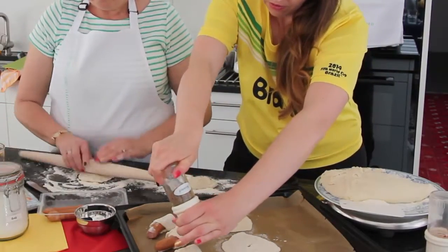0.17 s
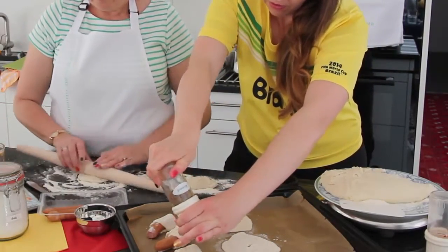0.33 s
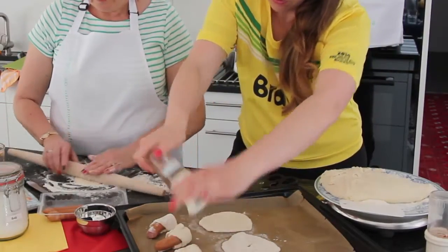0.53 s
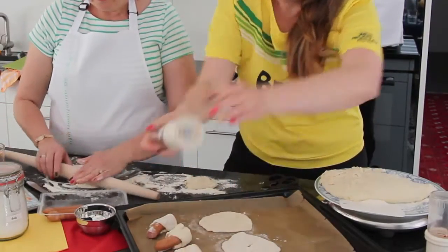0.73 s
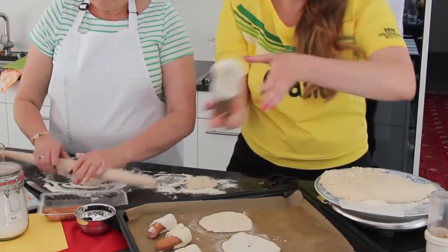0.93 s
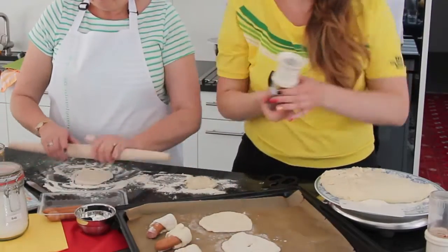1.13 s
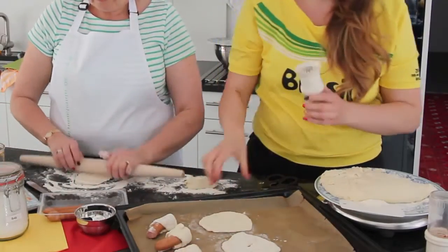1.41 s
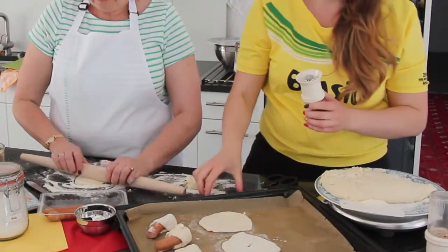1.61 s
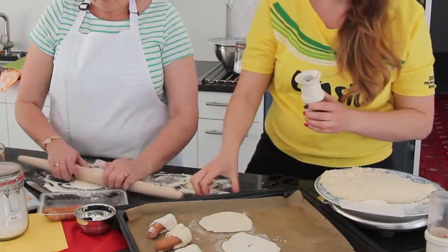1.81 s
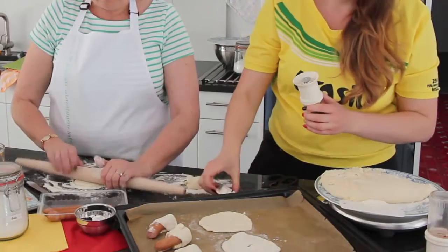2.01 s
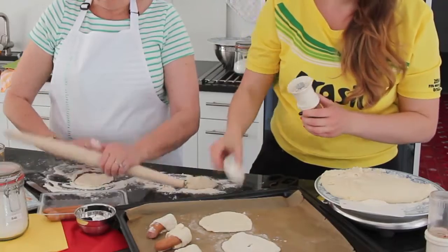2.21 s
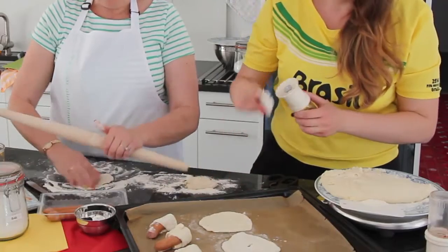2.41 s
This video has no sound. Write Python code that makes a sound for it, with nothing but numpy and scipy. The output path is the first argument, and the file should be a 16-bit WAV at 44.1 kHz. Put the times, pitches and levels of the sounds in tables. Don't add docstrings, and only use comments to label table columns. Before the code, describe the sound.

Rolling pin knocks and rebounds on a hard kitchen counter, followed by a softer thud and hollow cap clacks

```python
import sys
import numpy as np
from scipy import signal
from scipy.fft import rfft, irfft
from scipy.io import wavfile
from scipy.ndimage import uniform_filter1d

SR = 44100
rng = np.random.default_rng(int(sys.argv[2]) if len(sys.argv) > 2 else 0)


def to_linear_factor(level_db):
    exponent = np.asarray(level_db, float) / 20
    return 10 ** exponent


def generate_wav(signal):
    frames = np.transpose(np.atleast_2d(signal))
    scaled = np.clip(frames, -1, 1) * 32767
    pcm = np.round(scaled).astype(np.int16)
    wavfile.write(sys.argv[1], SR, pcm)


N = 112454


# start_s, ring_db, knock_db, tilt_db_per_octave
DROP_BLOWS = [
    (.2008, -26.5, -19.5, 4),
    (.2043, -22.5, -25, 0),
]
# mode_hz, level_db, t60_s
DROP_MODES = [(152, -18.5, 0.074), (449, -12.5, 0.082), (628.6, -15, 0.18), (1150, -10.5, 0.09),
              (1364, -5.5, 0.11), (2313, -5.5, 0.029), (2371, -5, .04), (2760, -4, 0.014),
              (3217, -9.5, 0.026), (3570, -13.5, 0.06), (4950, -6, 0.0075), (4830, -10, 0.01)]
# start_s, ring_db, knock_db, tilt_db_per_octave
REBOUND_BLOWS = [
    (.3378, -18, -28, -2.5),
]
# mode_hz, level_db, t60_s
REBOUND_MODES = [(198, -20.5, 0.042), (352, -19.5, 0.031), (485, -16, 0.039), (1105, -5.5, 0.018),
                 (1348, 2.5, 0.028), (1880, -8.5, 0.027), (2393, -3.5, 0.028), (3630, -13, 0.046)]
# start_s, ring_db, knock_db, tilt_db_per_octave
DOUGH_BLOWS = [
    (1.4907, -35.5, -33, -3),
    (1.4942, -26, -36.5, 0),
]
# mode_hz, level_db, t60_s
FLAT_PIN_MODES = [(172.3, -11.5, 0.11), (248.4, -9.5, 0.065), (434, -10.5, 0.097), (624, -14.5, .25),
                  (1150, -9, 0.06), (1333, -3, 0.088), (2250, -9, .03), (2382, -4.5, 0.048),
                  (5000, -13, 0.0067)]
# start_s, ring_db, knock_db, tilt_db_per_octave
LIFT_BLOWS = [
    (2.476, -47, -48, -3),
]
# mode_hz, level_db, t60_s
HELD_PIN_MODES = [(644, -6, 0.31), (420, -6.5, 0.078), (1407, 9, 0.02), (2550, -19, 0.028),
                  (4000, -5, 0.05), (4800, -8, .03)]
# freq_hz, level_db_per_hz
THUD_SPECTRUM = [(60, -49), (160, -11), (450, -2), (750, -7.5), (1600, -12), (2400, -9), (3800, -8.5),
                 (6500, -63)]


def wooden_pin():
    return (struck(DROP_BLOWS, DROP_MODES, THUD_SPECTRUM)
            + struck(REBOUND_BLOWS, REBOUND_MODES, THUD_SPECTRUM)
            + struck(DOUGH_BLOWS, FLAT_PIN_MODES, THUD_SPECTRUM)
            + struck(LIFT_BLOWS, HELD_PIN_MODES, THUD_SPECTRUM))


# start_s, pitch_hz, level_db, t60_s
AFTER_RINGS = [
    (.2043, 1369, -24, .35),
    (.3378, 1367, -31, .9),
    (1.4942, 1366, -36, 1.1),
]


def pin_after_ring():
    rise_s = 0.005
    out = np.zeros((2, N))
    t = np.arange(SR) / SR
    for start_s, pitch_hz, level_db, t60_s in AFTER_RINGS:
        decay = to_linear_factor(level_db - 60 * t / t60_s)
        tone = decay * np.sin(2 * np.pi * pitch_hz * t) * (1 - np.exp(-t / rise_s))
        add(out, tone[None], start_s)
    return out


# start_s, ring_db, knock_db, tilt_db_per_octave
CAP_FLAT_BLOWS = [
    (2.0198, -24, -27, -1),
    (2.031, -41.5, -36, 8),
]
# mode_hz, level_db, t60_s
CAP_FLAT_MODES = [(381, -20.5, 0.073), (473, -13, 0.067), (820, -28, 0.01), (1078, -1.5, 0.065),
                  (1390, -13, 0.031), (1610, -13, 0.016), (1796, -10, 0.079), (3278, -8, 0.064),
                  (3640, -3.5, 0.015), (5750, -11, 0.0085), (9300, -21.5, 0.0095), (9840, -20, .012),
                  (13000, -25, .008)]
# start_s, ring_db, knock_db, tilt_db_per_octave
CAP_EDGE_BLOWS = [
    (2.1785, -25, -24, 0.5),
]
# mode_hz, level_db, t60_s
CAP_EDGE_MODES = [(483, -26.5, 0.06), (890, -22, .04), (1039, -5.5, 0.084), (1085, -2, 0.061),
                  (1296, -7, 0.053), (1500, -9, 0.038), (1681, -8.5, 0.23), (1842, -11.5, 0.06),
                  (2140, -11, 0.023), (2400, -18.5, 0.027), (3000, -6.5, 0.028), (3270, -9, 0.038),
                  (3500, 0.5, 0.011)]
# freq_hz, level_db_per_hz
CLACK_SPECTRUM = [(150, -58), (300, -9.5), (1000, 4), (1800, 6), (3300, -3.5), (4500, -11), (8000, -24),
                  (14000, -56)]


def jar_cap():
    return (struck(CAP_FLAT_BLOWS, CAP_FLAT_MODES, CLACK_SPECTRUM)
            + struck(CAP_EDGE_BLOWS, CAP_EDGE_MODES, CLACK_SPECTRUM))


def struck(blows, modes, knock_spectrum):
    knock_t60_s, attack_s, knock_low_hz, scatter_db = 0.034, 0.00059, 130, 1
    out = np.zeros((2, N))
    t = np.arange(8192) / SR
    mode_hz, level_db, t60_s = np.transpose(modes)[:, :, None]
    high_pass = signal.butter(2, knock_low_hz, "high", fs=SR, output="sos")
    for start_s, ring_db, knock_db, tilt_db in blows:
        size_db = level_db + tilt_db * np.log2(mode_hz / 1000)
        size_db = size_db + scatter_db * rng.standard_normal(mode_hz.shape)
        ring = np.sum(to_linear_factor(size_db - 60 * t / t60_s) * np.sin(2 * np.pi * mode_hz * t), 0)
        knock = unit(coloured(rng.standard_normal(len(t)), knock_spectrum, tilt_db))
        knock = signal.sosfilt(high_pass, knock * to_linear_factor(-60 * t / knock_t60_s))
        hit = (to_linear_factor(ring_db) * ring + to_linear_factor(knock_db) * knock) * (1 - np.exp(-t / attack_s))
        add(out, in_room(hit), start_s)
    return out


# start_s, level_db, pitch_hz, decay_cycles
SMALL_TICKS = [(0.036, -53.5, 3000, 7.5), (.052, -53.5, 7740, 3), (0.2598, -39, 7300, 1.9),
               (0.264, -42, 6960, 3.5), (0.382, -40, 7240, 1.54), (0.889, -57, 1150, 4.8),
               (1.095, -58.5, 3630, 30), (1.101, -49, 5000, 6), (1.181, -54, 3750, 7),
               (1.828, -55, 5470, 12), (1.833, -50, 3580, 13), (1.84, -64, 592, 11),
               (1.835, -56, 6000, 8.7), (2.479, -42.5, 5000, 1.1)]


def ticks():
    out = np.zeros((2, N))
    t = np.arange(2048) / SR
    for start_s, level_db, pitch_hz, cycles in SMALL_TICKS:
        tones_hz = pitch_hz * np.exp(0.08 * rng.standard_normal((3, 1)))
        tick = np.sum(np.sin(2 * np.pi * tones_hz * t), 0) * np.exp(-t * pitch_hz / cycles)
        add(out, in_room(to_linear_factor(level_db) * tick), start_s)
    return out


# start_s, level_db
CABINET_BOOMS = [
    (.21, -49),
    (0.346, -41),
    (1.499, -49),
    (2.49, -52),
]


def cabinets():
    pitch_hz, rise_s, t60_s = 56, 0.026, 0.42
    out = np.zeros((2, N))
    t = np.arange(SR // 2) / SR
    boom = np.sin(2 * np.pi * pitch_hz * t) * (1 - np.exp(-t / rise_s)) * to_linear_factor(-60 * t / t60_s)
    for start_s, level_db in CABINET_BOOMS:
        add(out, to_linear_factor(level_db) * boom[None], start_s)
    return out


# freq_hz, t60_s
ROOM_DECAY = [(60, 0.52), (250, 0.82), (700, 0.57), (1400, 0.48), (2500, 0.56), (5000, 0.49), (10000, 0.23)]
# freq_hz, level_db
ROOM_WIDTH = [(100, -18.5), (1000, -10), (3000, -5), (8000, -3)]
# freq_hz, level_db
WALL_COLOUR = [(100, -0.5), (1500, 2), (4000, -3), (10000, 1)]


def in_room(x):
    room_db, delay_s, rise_s = 1, 0.0012, 0.0046
    early_db, early_s = -3.5, 0.025
    smooth_bins = 20
    hz, t, z = signal.stft(rng.standard_normal((2, SR)), SR, nperseg=256)
    decay = to_linear_factor(-60 * t / along(ROOM_DECAY, hz)[:, None])
    tail = signal.istft(z * decay, SR, nperseg=256)[1][:, :SR]
    since_s = np.clip(np.arange(SR) / SR - delay_s, 0, 1)
    early = 1 + to_linear_factor(early_db) * np.exp(-(since_s / early_s) ** 2)
    spectrum = rfft(tail * (1 - np.exp(-since_s / rise_s)) * early)
    power = abs(spectrum) ** 2
    near = uniform_filter1d(power, size=smooth_bins)
    far = uniform_filter1d(power, size=30 * smooth_bins)
    alive = (since_s > 0) * np.clip(8 - 10 * since_s, 0, 1)
    tail = irfft(spectrum * np.sqrt(far / near), SR) * alive
    mid = tail[0]
    side = coloured(tail[1], ROOM_WIDTH) * alive
    pair = np.array([mid + side, mid - side]) / np.linalg.norm(mid)
    pair = coloured(pair, WALL_COLOUR) * alive
    wet = signal.fftconvolve(x[None], pair, axes=1)
    return to_linear_factor(room_db) * wet + np.pad(x, (0, SR - 1))


# time_s, level_db
AIR_SWELL = [(0, -58), (.15, -60.5), (.7, -60.5), (.95, -59), (1.1, -57), (1.3, -59.5), (1.6, -59.5),
             (2.55, -60.5)]
# freq_hz, level_db_per_hz
AIR_MID_SPECTRUM = [(15, -78), (25, -3), (88, -12), (326, -6), (393, -4.5), (486, -10), (766, -10.5),
                    (3510, -17), (14900, -29.5)]
# freq_hz, level_db_per_hz
AIR_SIDE_SPECTRUM = [(15, -51), (25, -44), (69, -3), (382, -4), (414, -3), (486, -7), (652, -5),
                     (7040, -18.5), (14900, -27)]
# pitch_hz, rms_db
APPLIANCE_HUM = [(99, -70.5), (131, -72.5), (250, -72)]


def air():
    air_db, side_db, patchy_db = 1, 0.5, 0.7
    z = signal.stft(rng.standard_normal((2, N + 512)), nperseg=512)[2]
    patches = uniform_filter1d(rng.standard_normal(z.shape[1:]), size=6, axis=0)
    patches = unit(uniform_filter1d(patches, size=10, axis=1))
    pair = signal.istft(z * to_linear_factor(patchy_db * patches), nperseg=512)[1][:, :N]
    mid = unit(coloured(pair[0], AIR_MID_SPECTRUM))
    side = to_linear_factor(side_db) * unit(coloured(pair[1], AIR_SIDE_SPECTRUM))
    t = np.arange(N) / SR
    hum = np.zeros(N)
    for pitch_hz, rms_db in APPLIANCE_HUM:
        drift_rad = np.cumsum(rng.standard_normal(N)) * 0.017
        hum += to_linear_factor(rms_db) * np.sqrt(2) * np.sin(2 * np.pi * pitch_hz * t + drift_rad)
    swell = to_linear_factor(air_db + np.interp(t, *np.transpose(AIR_SWELL)))
    return swell * np.array([mid + side, mid - side]) + hum


def unit(x):
    return x / np.sqrt(np.mean(x ** 2) + 1e-20)


def along(points, hz):
    point_hz, value = np.transpose(points)
    return np.interp(np.log(hz + 1), np.log(point_hz + 1), value)


def coloured(x, spectrum, tilt_db=0):
    hz = np.fft.rfftfreq(x.shape[-1], 1 / SR)
    gain_db = along(spectrum, hz) + tilt_db * np.log2((hz + 1) / 1000)
    return irfft(rfft(x) * to_linear_factor(gain_db), x.shape[-1])


def add(out, sound, start_s):
    part = out[:, round(start_s * SR):][:, :sound.shape[1]]
    part += sound[:, :part.shape[1]]


def scene():
    pan_db = 0.39
    contacts = wooden_pin() + pin_after_ring() + jar_cap() + ticks()
    return (contacts + cabinets() + air()) * to_linear_factor([[pan_db], [-pan_db]])


def roll_off(x):
    return signal.sosfilt(signal.butter(12, 15040, fs=SR, output="sos"), x)


# freq_hz, level_db
MICROPHONE_COLOUR = [(20, -36), (45, 2), (12000, 2), (14000, -6.5), (15000, 4)]


def record(dry):
    mix = coloured(dry, MICROPHONE_COLOUR)
    return roll_off(mix)


dry = scene()
out = record(dry)
generate_wav(out)
```